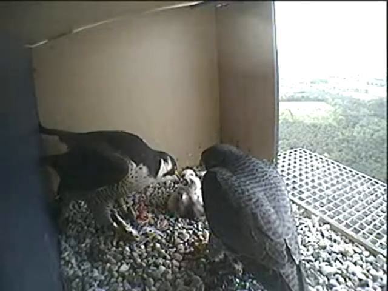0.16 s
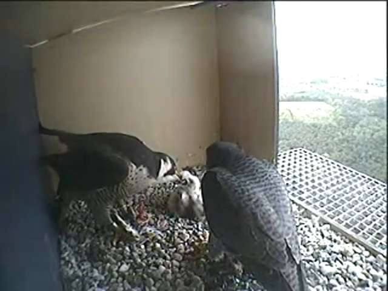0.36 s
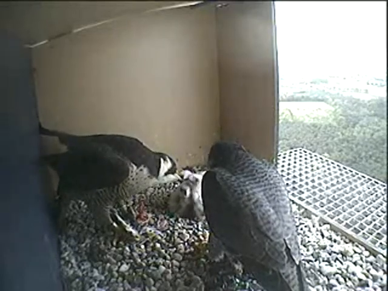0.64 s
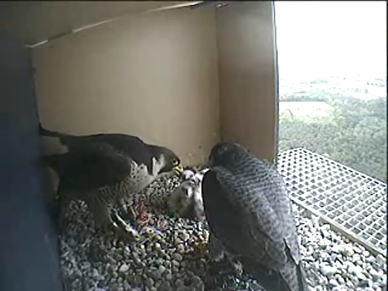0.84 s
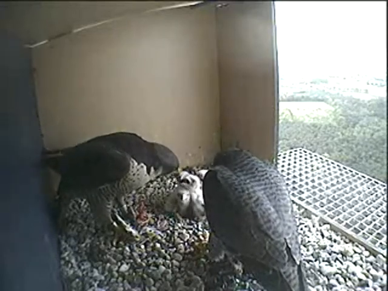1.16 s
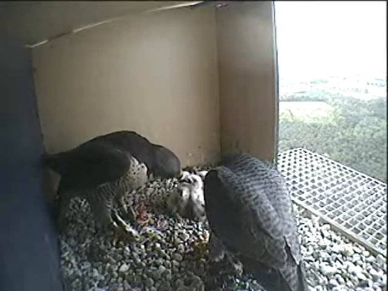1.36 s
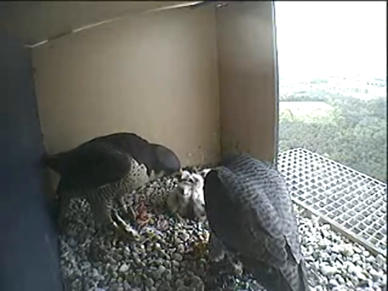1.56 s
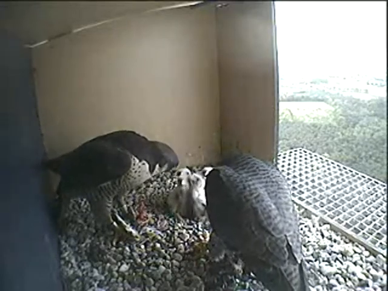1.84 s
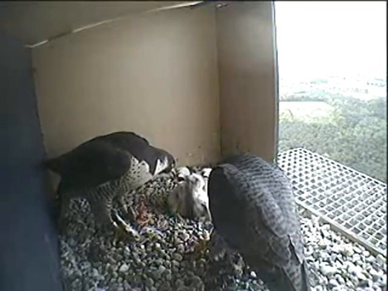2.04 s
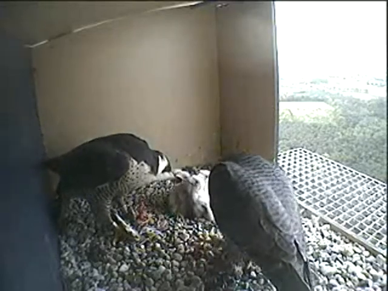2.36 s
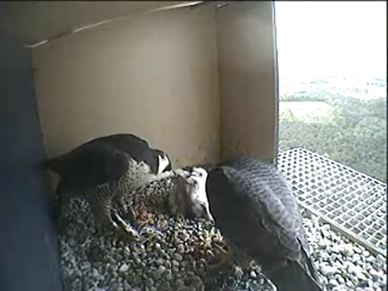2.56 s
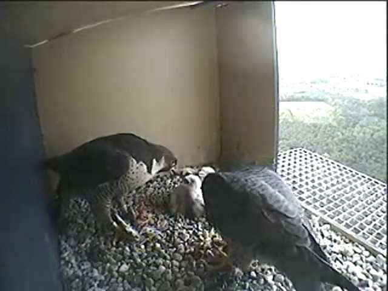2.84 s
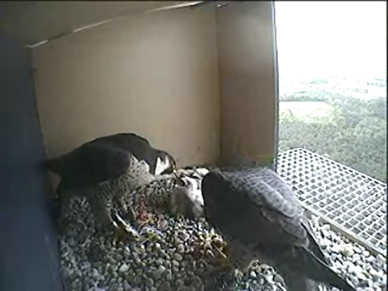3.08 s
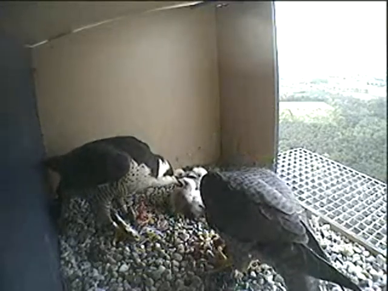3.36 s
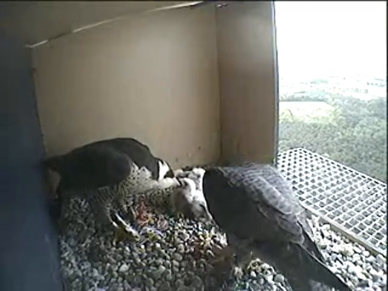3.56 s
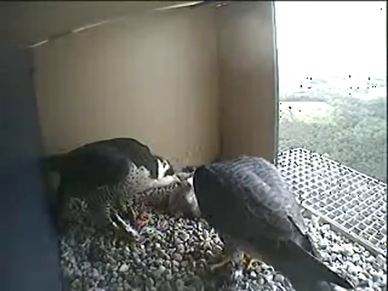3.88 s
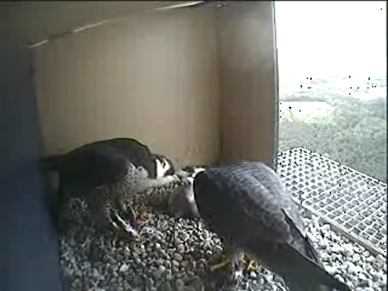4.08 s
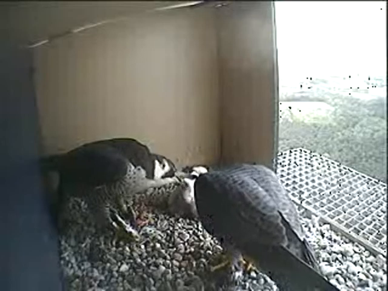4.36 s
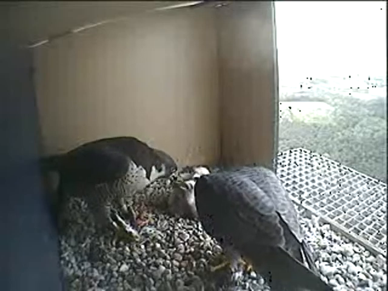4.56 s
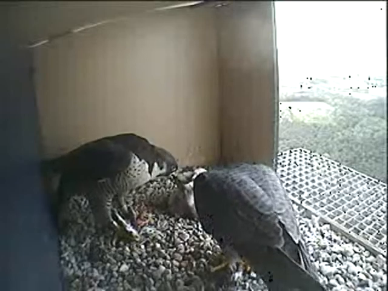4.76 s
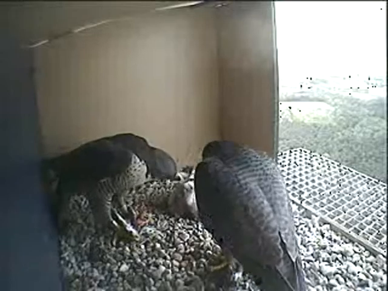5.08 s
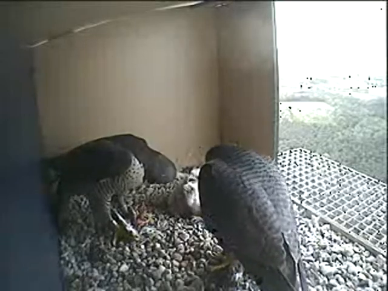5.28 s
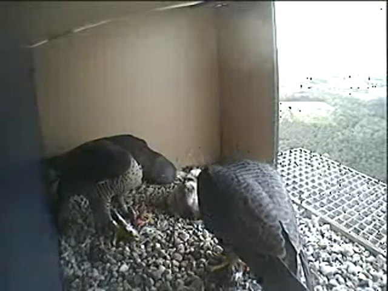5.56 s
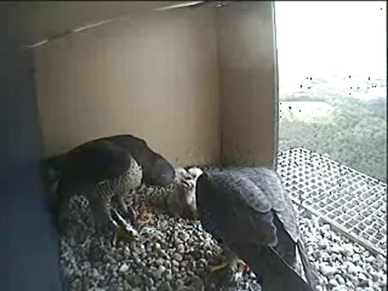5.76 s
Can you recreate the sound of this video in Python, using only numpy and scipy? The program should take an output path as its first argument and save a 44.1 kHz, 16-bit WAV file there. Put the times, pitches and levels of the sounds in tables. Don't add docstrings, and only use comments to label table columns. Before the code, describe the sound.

Very close to the microphone in a small wooden nest box, an adult falcon gives five short, loud chups, each a piercing whistle edged with croak, some slightly clipped. Between and after them, muffled chicks whine thinly, rising and dropping. Feathers rustle softly, gravel ticks a few times and faraway traffic hums low throughout.

```python
import sys
import numpy as np
from scipy import signal
from scipy.fft import rfft, irfft
from scipy.io import wavfile
from scipy.ndimage import uniform_filter1d

SR = 44100
rng = np.random.default_rng(int(sys.argv[2]) if len(sys.argv) > 2 else 0)


def generate_wav(signal):
    frames = np.transpose(np.atleast_2d(signal))
    scaled = np.clip(frames, -1, 1) * 32767
    pcm = np.round(scaled).astype(np.int16)
    wavfile.write(sys.argv[1], SR, pcm)


def natural_amplitude(level_db):
    exponent = np.asarray(level_db, float) / 20
    return 10 ** exponent


N = 261072
TIME = np.arange(N) / SR


def read(points, hz):
    curve_hz, db = np.transpose(points)
    return np.interp(np.log(hz), np.log(curve_hz), db)


def colour(x, points):
    hz = np.maximum(np.arange(len(x) // 2 + 1) * SR / len(x), 1)
    return irfft(rfft(x) * natural_amplitude(read(points, hz)), len(x))


def unit(x):
    return x / np.sqrt(np.mean(x ** 2))


def walk(rate, size=N):
    hold = max(int(SR / rate), 1)
    held = np.repeat(rng.standard_normal(size // hold + 1), hold)
    return uniform_filter1d(uniform_filter1d(held, hold), hold)[:size]


def step(x):
    return 1 / (1 + np.exp(-x))


def play(gesture, fade_s):
    s, *columns = np.transpose(gesture)
    span = slice(int(s[0] * SR), min(int(s[-1] * SR), N))
    t = TIME[span]
    fade = np.clip(np.minimum(t - s[0], s[-1] - t) / fade_s, 0, 1)
    return span, fade, [np.interp(t, s, column) for column in columns]


# (frequency [Hz], level [dB per Hz])
BREATH_COLOUR = [(300, -14.5), (1500, -15), (3400, 2.5), (5200, -6.5), (6000, -13), (7400, -5.5),
                 (8900, -16), (10000, -6.5), (11500, -19.5)]


def membrane_tone(gestures, wobble, flutter_db, flutter_rate, rasp, fall_db, fade_s, breath_db):
    out, air = np.zeros(N), np.zeros(N)
    for gesture in gestures:
        span, fade, (hz, *db) = play(gesture, fade_s)
        size = len(hz)
        phase = 2 * np.pi * np.cumsum(hz * (1 + wobble * walk(flutter_rate, size))) / SR
        air[span] += fade * natural_amplitude(np.max(db, axis=0))
        db += [db[1] - fall_db, db[2] - fall_db]
        for k, partial_db in enumerate(db, 1):
            shaky = natural_amplitude(partial_db + flutter_db * walk(flutter_rate, size))
            halo = rasp * walk(700, size)
            partial = np.sin(k * phase) + halo * np.cos(k * phase)
            out[span] += fade * (k * hz < 11000) * np.sqrt(2) * shaky * partial
    return out + natural_amplitude(breath_db) * air * unit(colour(rng.standard_normal(N), BREATH_COLOUR))


# (frequency [Hz], level under the first partial [dB])
THROAT_OVERTONES = [(4500, -5), (5200, -3), (6400, -9.5), (7200, -5), (7800, -10), (9500, -11),
                    (10700, -29)]


def whistle_gestures(rows, arched, scoop, bright_db, late_db):
    attack_s, tail_s, overtones_open_s = 0.0078, 0.018, 0.033
    arch, tail_sag = 0.059 * arched, 0.04
    for s, hold_s, first_hz, last_hz, db in rows:
        t = np.arange(0, hold_s + tail_s, .001)
        held, tail = np.minimum(t / hold_s, 1), np.maximum(t - hold_s, 0)
        early = np.maximum(1 - t / attack_s, 0)
        bend = 1 + arch * np.sin(np.pi * held ** 1.6) ** 2 - scoop * early - tail_sag * tail / tail_s
        hz = (first_hz + (last_hz - first_hz) * held) * bend
        level = db + 3 * arched * (np.sin(np.pi * held) - 1) - 31 * early - 1000 * tail
        level = level - 6.5 * arched * step((held - .7) / 0.1) * (1 + np.cos(2 * np.pi * 150 * t))
        late = late_db * np.maximum(1 - t / overtones_open_s, 0)
        overtones = [level + bright_db + (k - 1) * late + read(THROAT_OVERTONES, k * hz) for k in (2, 3)]
        yield np.transpose([s + t, hz, level, *overtones])


# (start [s], hold [s], first pitch [Hz], last pitch [Hz], level [dB])
ARCHED = [
    (.612, .04, 2439, 2430, -9.5),
    (2.19, .062, 2274, 2446, -11),
]
# (start [s], hold [s], first pitch [Hz], last pitch [Hz], level [dB])
PRESSED = [
    (2.62, 0.021, 3640, 3568, -9),
    (3.03, 0.018, 3654, 3195, -10.5),
    (3.038, 0.016, 2650, 2306, -15),
    (4.287, 0.031, 2630, 2614, -13),
]
# (start [s], hold [s], first pitch [Hz], last pitch [Hz], level [dB])
SECOND_MEMBRANE = [
    (2.234, .026, 3282, 3233, -20.5),
    (3.0, 0.025, 3580, 4170, -36.5),
    (3.018, .02, 5684, 5740, -30.5),
    (4.279, .011, 3743, 3530, -17.5),
    (4.285, .012, 5725, 5850, -24),
]


def parent_whistles():
    calls = [*whistle_gestures(ARCHED, 1, 0.09, 0.5, -7), *whistle_gestures(PRESSED, 0, 0.049, 3.5, -14.5)]
    sides = list(whistle_gestures(SECOND_MEMBRANE, 0, 0, -11, -4))
    clear = membrane_tone(calls, wobble=0.0062, flutter_db=2.5, flutter_rate=200, rasp=.1,
                          fall_db=12, fade_s=0.00067, breath_db=-16.5)
    return clear + membrane_tone(sides, wobble=0.011, flutter_db=2.5, flutter_rate=200, rasp=.4,
                                 fall_db=12, fade_s=0.00083, breath_db=-12)


# (start [s], length [s], level [dB], tilt [dB per octave], throat ring [dB])
TIGHTENING = [
    (2.595, 0.032, -20.5, -1, 14),
    (2.997, 0.02, -34, 11, 3),
    (4.26, 0.029, -25, -1.5, 14),
]
# (start [s], length [s], level [dB], tilt [dB per octave], throat ring [dB])
SLACKENING = [
    (0.662, .056, -24, -2, -1),
    (2.234, 0.059, -19, 6, 2.5),
    (2.65, 0.043, -24, -0.5, 11.5),
    (3.063, .036, -28.5, 2, 9.5),
    (4.328, .045, -27.5, -1.5, -0.5),
]


def croak_gestures():
    loose_hz, tight_hz, slack_hz = 343.8, 666, 224.3
    for s, length_s, db, tilt_db, ring_db in TIGHTENING:
        t = np.arange(0, length_s + 0.012, .001)
        tight = step((t - .018) / .003)
        hz = loose_hz * (tight_hz / loose_hz) ** tight
        level = db - 14 * np.maximum(1 - t / 0.0061, 0) - 3 * tight - 5000 * np.maximum(t - length_s, 0)
        tilt = tilt_db - 8 * (t / length_s) ** 3
        ring = ring_db - 12 * step((t - length_s + .01) / 0.0014)
        yield np.transpose([s + t, hz, level, tilt, ring])
    for s, length_s, db, tilt_db, ring_db in SLACKENING:
        t = np.arange(0, length_s, .001)
        slack = step((t / length_s - 0.5) / .12)
        hz = tight_hz * (slack_hz / tight_hz) ** slack
        level = db - 12 * np.maximum(1 - t / 0.0071, 0) - 12 * slack ** 2
        ring = ring_db + 5 * np.sin(np.pi * slack)
        yield np.transpose([s + t, hz, level, tilt_db - 16 * slack ** 4, ring])


def parent_croaks():
    jitter, throat_hz, throat_width_hz = .06, 1935, 260
    out, k = np.zeros(N), np.arange(1, 41)[:, None]
    smear = rng.standard_normal(k.shape)
    for gesture in croak_gestures():
        span, fade, (hz, db, tilt_db, ring_db) = play(gesture, 0.001)
        cycles = np.cumsum(hz * (1 + jitter * walk(300, len(hz)))) / SR
        ring = np.exp(-((k * hz - throat_hz) / throat_width_hz) ** 2)
        gains = natural_amplitude(tilt_db * np.log2(k)) * (k * hz < 11000)
        slaps = np.sum(gains * natural_amplitude(ring_db * ring) * np.cos(2 * np.pi * k * cycles + smear), axis=0)
        slaps = slaps / np.sqrt(np.sum(gains ** 2, axis=0) / 2)
        puff = np.exp(-(cycles % 1) / 0.38) * rng.standard_normal(len(hz))
        out[span] += fade * natural_amplitude(db) * (slaps + puff)
    return colour(out, [(100, -5.0), (250, -13.0), (2000, -9), (3600, 0.0), (5000, -9.5),
                        (8000, -9.0), (11000, -23.5)])


# (frequency [Hz], width [Hz], level [dB])
BOX_MODES = [(260, 21, -10), (704.6, 29, -5), (1020, 10, -14), (1255, 66, -9), (1580, 32, 1), (1930, 28, 4),
             (2370, 32, -4), (2678, 57, -2.5), (3270, 50, -16.5), (3240, 84, -16), (3598, 120, -24),
             (3554, 280, -19), (4400, 52, -40.5), (5000, 35, -29.5)]


def box(x, modes_db, walls_db, t60=0.047):
    t = TIME[:SR // 3]
    modes = 0
    for hz, width_hz, db in BOX_MODES:
        decay = np.exp(-np.pi * width_hz * t)
        modes = modes + natural_amplitude(db) * 2 * np.pi * width_hz / SR * decay * np.sin(2 * np.pi * hz * t)
    walls = rng.standard_normal(len(t)) * natural_amplitude(-60 * t / t60) * (t > .002)
    response = natural_amplitude(modes_db) * modes + natural_amplitude(walls_db) * walls / np.sqrt(np.sum(walls ** 2))
    return x + signal.fftconvolve(x, response)[:N]


def even_tail(x):
    scatter = rng.standard_normal(SR // 5) * (TIME[:SR // 5] < .07)
    return x + natural_amplitude(-24) * signal.fftconvolve(x, scatter / np.sqrt(np.sum(scatter ** 2)))[:N]


# (frequency [Hz], level [dB])
MICROPHONE_DIPS = [(5300, -0.63), (6000, -2), (6700, 1.75), (8200, -3.7), (8800, -6), (9400, -1.75)]


def parent():
    whistles = box(parent_whistles(), -5.5, -9.0, 0.068)
    croaks = box(parent_croaks(), 20.1, -2.7, 0.21) * natural_amplitude(2.0)
    return colour(even_tail(whistles + croaks), MICROPHONE_DIPS)


# (start [s], end [s], first pitch [Hz], held pitch [Hz], level [dB])
RISING = [
    (1.155, 1.56, 1668, 2090, -66.5),
    (1.52, 1.66, 1135, 1830, -64.5),
    (1.72, 2.18, 2570, 2376, -70),
    (2.915, 3.0, 1718, 2018, -63),
    (3.98, 4.255, 1221, 2045, -68),
    (5.47, 5.63, 1813, 2003, -74),
]
# (start [s], end [s], held pitch [Hz], last pitch [Hz], level [dB])
FALLING = [
    (1.9, 2.175, 1870, 1570, -68),
    (2.34, 2.595, 2079, 1820, -58.5),
    (3.238, 3.674, 2082, 1160, -57.5),
    (4.414, 4.981, 2177, 1166, -60),
    (4.739, 4.943, 1930, 1216, -67),
]
# (start [s], end [s], first pitch [Hz], last pitch [Hz], level [dB])
DRIFTING = [(0.796, 0.947, 1963, 1973, -73.5), (.9, 1.063, 2054, 2187, -70.5),
            (1.252, 1.524, 2325, 2496, -70), (1.493, 1.717, 2480, 2245, -63.5),
            (1.595, 2.186, 2022, 2096, -64.5), (2.8, 2.92, 1658, 1728, -74),
            (3.102, 3.22, 2350, 2060, -73.5), (3.495, 4.008, 2314, 2586, -76),
            (3.66, 3.865, 2130, 2180, -78.5), (1.65, 1.947, 1790, 1760, -80), (1.6, 1.907, 2720, 2680, -73),
            (4.031, 4.249, 2400, 2540, -73), (4.456, 4.82, 2400, 2623, -78), (4.92, 5.146, 1955, 1949, -69),
            (5.223, 5.462, 2225, 2300, -75), (5.602, 5.925, 2075, 2107, -63.5),
            (5.766, 5.93, 2286, 2680, -69)]
# (frequency [Hz], level [dB])
CHICK_THROAT_CURVE = [(1200, 2.5), (1750, -11.5), (1970, 7.5), (2120, -5.5), (2500, 2.5), (3300, -4),
                      (4200, -4.5), (6300, -7.5)]
CHICK_PARTIALS_DB = (-1.8, -1.4, -4.5)


def whine_gestures():
    for rows in (RISING, FALLING, DRIFTING):
        for s, end_s, first_hz, last_hz, db in rows:
            t = np.arange(s, end_s, .004)
            share, sag_hz = (t - s) / (end_s - s), 0
            if rows is RISING:
                move = 1 - np.exp((s - t) / .024)
                effort_db = 8.5 * np.exp((s - t) / .05)
            elif rows is FALLING:
                move = np.exp((share - 1) / 0.1)
                effort_db = -11.5 * (1 - share) ** 2 - 4.5 * move
                sag_hz = -200 * (t - s) * share
            else:
                move = share
                effort_db = -10 * np.maximum(1 - np.minimum(t - s, end_s - t) / .04, 0)
            hz = first_hz + (last_hz - first_hz) * move + sag_hz
            hz = hz * (1 + .012 * walk(SR / 12, len(t)))
            partials = []
            for k, partial_db in enumerate(CHICK_PARTIALS_DB, 1):
                waver_db = 2.5 * walk(SR / 15, len(t))
                partials.append(db + effort_db + partial_db + waver_db + read(CHICK_THROAT_CURVE, k * hz))
            yield np.transpose([t, hz, *partials])


def chicks():
    whines = membrane_tone(list(whine_gestures()), wobble=.01, flutter_db=5.0, flutter_rate=60, rasp=.5,
                           fall_db=6, fade_s=0.0045, breath_db=-12)
    return box(whines, -2.8, -6, 0.155) * natural_amplitude(4.0)


# (middle [s], half length [s], level [dB])
SHAKES = [(0.014, 0.059, -64.5), (0.207, 0.077, -69), (0.412, 0.089, -66.5), (0.598, 0.064, -54.5),
          (0.844, 0.26, -76), (1.062, 0.11, -66), (1.34, 0.11, -76), (1.99, 0.46, -61),
          (2.563, 0.14, -66.5), (2.924, 0.094, -64.5), (3.462, 0.17, -64.5), (3.763, 0.18, -91),
          (4.045, 0.08, -63), (4.56, 0.37, -72.5), (4.82, .07, -66.5), (5.02, 0.045, -69.5),
          (5.25, 0.089, -75.5), (5.701, 0.27, -76)]
# (frequency [Hz], level [dB per Hz])
FEATHER_COLOUR = [(1000, -17.5), (2000, -3), (3200, -9), (5000, -8), (6000, -12), (7500, -4.5), (8900, -9),
                  (10200, -4), (10900, -11), (11700, -12.5), (12500, -49.5)]


def feathers():
    shaken = natural_amplitude(-77)
    for middle_s, half_s, db in SHAKES:
        shaken = shaken + natural_amplitude(db) * np.exp(-((TIME - middle_s) / half_s) ** 2)
    rustle = 0
    for hz in 1100 * 2 ** np.arange(0, 3.5, .25):
        band = [(hz / 1.2, -60), (hz / 1.09, 0), (hz * 1.09, 0), (hz * 1.2, -60)]
        flicker = natural_amplitude(4 * walk(8) + 1.5 * walk(40))
        rustle = rustle + colour(rng.standard_normal(N), band) * flicker
    return unit(colour(rustle, FEATHER_COLOUR)) * natural_amplitude(7.5) * shaken


# (time [s], peak level [dB], centre frequency [Hz])
GRAVEL = [
    (0.298, -37, 217),
    (.329, -32, 211),
    (0.414, -35.5, 8050),
    (2.096, -52, 2360),
    (3.486, -38.5, 5230),
    (3.996, -58, 2990),
    (5.079, -42, 4410),
    (5.189, -63, 4060),
]


def gravel():
    out, t = np.zeros(N), TIME[:800]
    for s, db, hz in GRAVEL:
        if hz < 500:
            grain = np.sin(2 * np.pi * hz * t)
        else:
            tick_colour = [(hz / 4, -20), (hz, 0), (10500, -6), (11500, -40)]
            grain = colour(rng.standard_normal(len(t)), tick_colour)
        out[int(s * SR):][:len(t)] += natural_amplitude(db) * np.exp(-t / 0.0087) * grain
    return box(out, 0, -15)


# (time [s], level [dB])
TRAFFIC_LEVEL = [(0.08, -46.5), (0.5, -47.5), (0.86, -50.5), (1.3, -49), (1.6, -50), (2.1, -47),
                 (2.46, -53), (2.88, -55), (3.3, -56.5), (3.8, -54), (4.1, -52.5), (4.55, -60.5),
                 (5.0, -53), (5.4, -57.5), (5.85, -55)]
# (frequency [Hz], level [dB per Hz])
TRAFFIC_COLOUR = [(15, -36.5), (25, -8.5), (64, -2), (128, -9.5), (205, -1), (446, -19), (671, -16),
                  (806, -22.5), (1120, -18.5), (1430, -30), (1860, -33), (3300, -30), (4290, -62.5),
                  (7260, -120)]


def traffic():
    drone = colour(rng.standard_normal(N), TRAFFIC_COLOUR) * natural_amplitude(2.5 * walk(14))
    return unit(box(drone, 16, -14.5)) * natural_amplitude(np.interp(TIME, *np.transpose(TRAFFIC_LEVEL)))


def line_whine():
    return natural_amplitude(-73 + 2.2 * walk(36)) * np.sin(2 * np.pi * 8030 * TIME)


def scene():
    return (parent() + chicks() + feathers() + gravel() + traffic() + line_whine())[None]


def input_stage(x):
    railed = x / (1 + np.abs(x / .56) ** 6) ** (1 / 6)
    thump = signal.sosfilt(signal.butter(2, 170, fs=SR, output="sos"), np.abs(x - railed))
    return signal.sosfilt(signal.butter(1, 18, "high", fs=SR, output="sos"), railed - .8 * thump)


def thin_stream(x):
    masked_db, quiet_db, loud_db, depth_db = -1, -100, -80, -12
    hz, _, cells = signal.stft(x, SR, nperseg=2048)
    power = uniform_filter1d(np.abs(cells) ** 2, size=3, axis=-1) + 1e-16
    typical = np.exp(uniform_filter1d(np.log(power), size=40, axis=-2))
    limit = np.minimum(natural_amplitude(2 * masked_db) * typical + natural_amplitude(2 * quiet_db), natural_amplitude(2 * loud_db))
    keep = np.maximum(power ** 2 / (power ** 2 + limit ** 2), natural_amplitude(depth_db))
    keep[..., hz < 1300, :] = 1
    return signal.istft(cells * keep, SR, nperseg=2048)[1][..., :N]


def band_limit(x):
    return signal.sosfilt(signal.butter(12, 15730, fs=SR, output="sos"), x)


def record(dry):
    mix = thin_stream(input_stage(dry))
    return band_limit(mix)


dry = scene()
out = record(dry)
generate_wav(out)
```